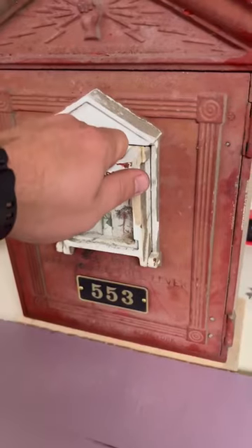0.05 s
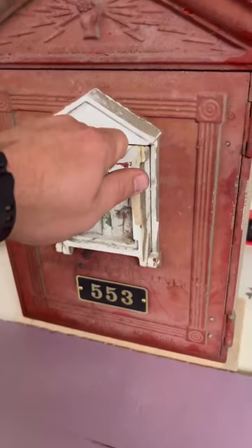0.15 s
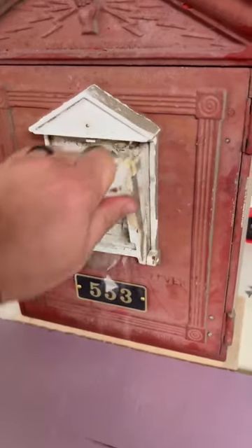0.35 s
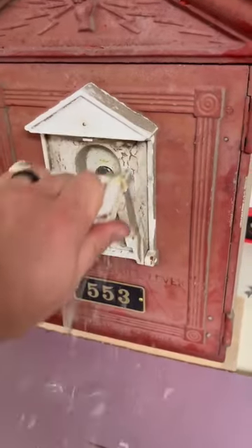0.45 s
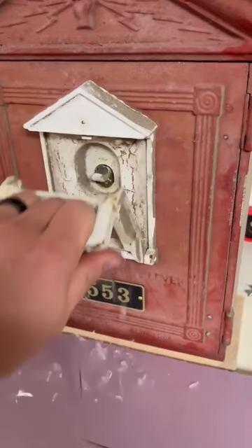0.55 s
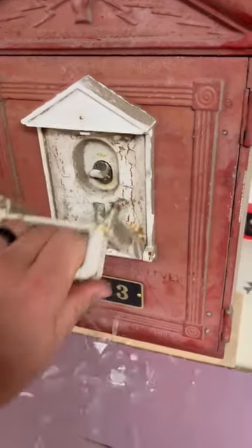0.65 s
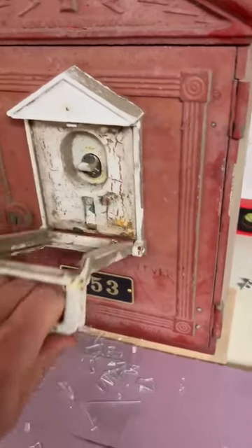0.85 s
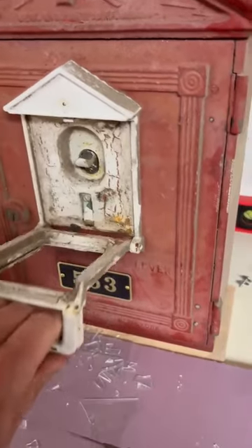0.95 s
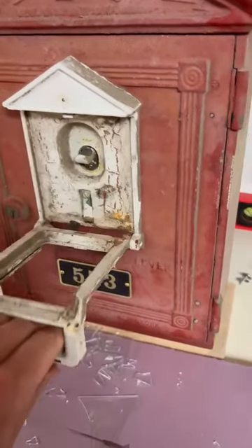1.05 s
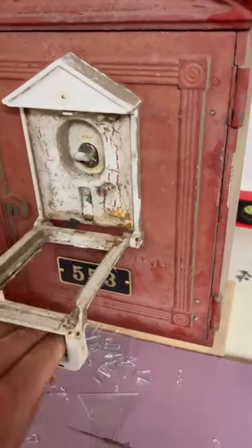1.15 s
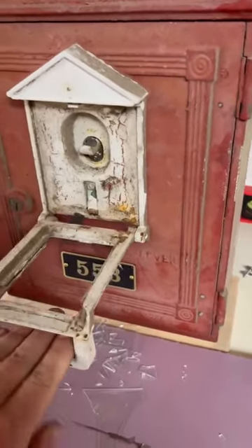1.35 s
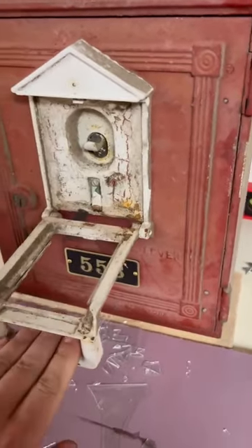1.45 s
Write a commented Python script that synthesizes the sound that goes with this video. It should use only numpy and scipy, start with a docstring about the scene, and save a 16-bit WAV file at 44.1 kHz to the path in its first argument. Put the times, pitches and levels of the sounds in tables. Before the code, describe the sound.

A small glass pane breaks close by in a small room with a faint low hum. At about 0.2 seconds the frame of a metal alarm box door snaps, and near 0.3 the glass cracks sharply as the door comes free with a thump. From 0.4 to 1 second splinters patter on a surface below while larger shards knock, bounce and tinkle. A few faint clicks follow until about 1.5 seconds.

```python
"""Low room hum and rumble, then close ticks: the small door of a metal fire alarm box is pulled open.
Its frame snaps under strain; the glass pane cracks, rings and lets the door go with a thump.
Splinters patter on the surface below, heavy pieces knock on it, larger shards bounce and ring
with their own modes, small pieces click. The small room answers briefly."""
import sys
import numpy as np
from scipy import signal
from scipy.fft import rfft, irfft
from scipy.io import wavfile
from scipy.ndimage import map_coordinates

SR = 44100
rng = np.random.default_rng(int(sys.argv[2]) if len(sys.argv) > 2 else 0)


def wav_record(signal):
    """Record a signal, one row per channel, as 16-bit PCM in the file named by sys.argv[1]."""
    frames = np.transpose(np.atleast_2d(signal))
    bounded = np.clip(frames, -1, 1)
    # unit amplitude maps onto the largest positive 16-bit level
    quanta = np.round(bounded * 32767).astype(np.int16)
    wavfile.write(sys.argv[1], SR, quanta)


N = 66150

# hum envelope [t/s, level/dB]
HUM_ENVELOPE = [(0, -42.5), (.11, -52.5), (.17, -46.5), (1.18, -67), (1.27, -56), (1.35, -66.5)]
# room and handling rumble envelope [t/s, level/dB]
RUMBLE_ENVELOPE = [(0, -52.5), (.22, -48), (.6, -59), (1.0, -61.5), (1.15, -67.5), (1.5, -63.5)]
# rumble spectrum [f/Hz, level/dB]
RUMBLE_SPECTRUM = [(25, -24), (85, -3.5), (140, -6.5), (280, -8.5), (360, -20.5), (480, -17), (2200, -35),
                   (10000, -66)]
# air spectrum [f/Hz, level/dB]
AIR_SPECTRUM = [(300, -5), (1000, -5), (4000, -11), (11000, -35.5)]
# frame snaps [t/s, ring/dB, crack/dB]
FRAME_SNAPS = [(0.2252, -8, -25), (0.2344, -20.5, -32), (0.2655, -10.5, -36)]
# door frame modes [f/Hz, level/dB, t60/s]
FRAME_MODES = [(974, -6, 0.021), (1107, -0.5, 0.036), (2620, -0.5, 0.031), (3590, -15.5, 0.029)]
# crack spectrum [f/Hz, level/dB]
CRACK_SPECTRUM = [(100, -20.5), (700, -16.5), (1150, -2.5), (1600, -1.5), (4500, -1), (10000, 0.5),
                  (12000, -7)]
# splinter patter envelope [t/s, level/dB]
PATTER_ENVELOPE = [(.26, -35), (.29, -32), (.35, -44.5), (.38, -45.5), (.46, -38.5), (.52, -37.5),
                   (.56, -38.5), (.62, -42.5), (.665, -36), (.70, -42.5), (.75, -29.5), (.815, -46.5),
                   (.845, -42.5), (.88, -48.5), (.98, -49.5), (1.06, -61), (1.16, -77.5)]
# splinter and dust spectrum [f/Hz, level/dB]
PATTER_SPECTRUM = [(200, -24.5), (700, -10.5), (1400, -5.5), (2600, 2), (5000, 0.5), (8000, -7),
                   (11500, -14)]
# surface under the patter [f/Hz, level/dB]
BODY_SPECTRUM = [(120, -15), (270, 3), (480, -1), (720, -5), (1400, -1.5), (2400, -6), (5000, -32)]
# pane cracks [t/s, crack/dB, crack t60/s, ring/dB, rise/s]
PANE_CRACKS = [(0.2716, -12.5, 0.059, -9, 0.001), (0.2771, -5, 0.011, -25.5, 0.00029),
               (0.279, -29, 0.371, -28.5, 0.0088), (0.3192, -13, 0.02, -43.5, 0.00034),
               (0.328, -22, 0.1193, -40, 0.0072)]
# modes of the framed pane [f/Hz, level/dB, t60/s]
PANE_MODES = [(1188, 0.5, 0.043), (1316.4, 1.5, 0.053), (1500, -3, 0.07), (1748, -13, 0.17),
              (2440, -8, 0.059), (2880, -9, 0.052), (3716, -20, 0.15)]
# box modes [f/Hz, level/dB, t60/s]
BOX_MODES = [(56, -13, 0.65), (51, -3, 0.11), (135, -10, .06)]
# heavy pieces landing [t/s, ring/dB, bending wave/dB]
HEAVY_LANDINGS = [(0.3216, -39.5, -29), (0.451, -36.5, -55), (0.5235, -26.5, -25), (0.571, -39, -60),
                  (.644, -24, -40), (0.658, -31.5, -31.5), (0.736, -37, -44.5), (.838, -37.5, -48),
                  (.916, -37, -54), (0.963, -40.5, -48)]
# surface modes [f/Hz, level/dB, t60/s]
SURFACE_MODES = [(266.3, -1, 0.21), (286.4, -13, 0.21), (445.5, -3, 0.07), (516.5, -5.5, 0.055),
                 (951, -1, 0.05), (1421, -8, 0.23)]
# shard impacts [t/s, ring/dB, chatter/dB, tilt/(dB/oct), shard name]
SHARD_BOUNCES = [(.3312, -23.5, -20, -5, "flying"), (.386, -35.5, -47.5, -9.5, "spinning"),
                 (0.449, -36, -39, 17, "spinning"), (.499, -31.5, -59, -2, "wedge"),
                 (0.661, -29, -42, 8.5, "plate"), (.692, -27.5, -38, -7, "plate"),
                 (.704, -24.5, -35, -5, "plate"), (.724, -26.5, -34, -6, "plate"),
                 (.739, -22.5, -21, -0.5, "plate"), (.757, -26, -20, 4.5, "plate"),
                 (.829, -33, -49, -0.5, "sliver"), (.8945, -29, -27, 9, "chip"),
                 (.9115, -32, -41, -15, "sliver"), (.929, -41.5, -41, -15.5, "sliver"),
                 (.9622, -24, -33, -8, "sliver"), (.9735, -23, -19.5, 5, "sliver"),
                 (1.023, -53, -29.5, 2, "sliver"), (1.22, -28.5, -31.5, -1.5, "chip")]
# modes by shard name [f/Hz, level/dB, t60/s]
SHARD_MODES = { "flying": [(3943, -2, 0.056), (6608, -15.5, 0.49), (9780, 1.5, 0.11), (9500, -18.5, 0.1),
               (11230, -3.5, 0.2)], "spinning": [(7590, -5, .3), (8990, 3, 0.14), (9230, -13, 0.16)],
               "wedge": [(2700, 4, 0.087), (3790, -8, .25), (4667, 4.5, 0.11), (9539, -10.5, 0.24)],
               "plate": [(6713, -7, 0.21), (6945, -4.5, 0.27), (9119, -8, 0.24), (10200, -10.5, 0.08),
               (9748, -2.5, 0.13), (10037, -2, 0.12), (10650, -7.5, 0.041)], "sliver": [(5150, -1.5, 0.12),
               (6210, -1, 0.062), (7430, -6.5, 0.036), (9250, -4, 0.064), (9405, -6.5, 0.13),
               (11050, 0, 0.026)], "chip": [(2350, -9, 0.022), (4237, -13, 0.017), (5750, -9.5, 0.036),
               (6880, 0, 0.058), (9560, 2, 0.023), (10100, 1, 0.017)]}
# small pieces landing [t/s, level/dB, peak f/Hz, t60/s]
SMALL_LANDINGS = [(.405, -31, 3230, 0.038), (0.4302, -25.5, 2700, 0.021), (0.4753, -15.5, 4200, 0.014),
                  (0.4989, -20, 4540, 0.021), (0.51, -30, 4380, 0.052), (0.576, -36.5, 3620, 0.0142),
                  (0.6494, -17.5, 4676, 0.014), (.757, -21, 4330, 0.02), (0.839, -36, 2350, 0.054),
                  (0.9115, -29, 4070, 0.025), (0.958, -34, 3850, 0.15), (1.0672, -40.5, 3950, 0.022),
                  (1.288, -54, 2170, 0.034), (1.397, -52, 9200, 0.09), (1.428, -54, 7500, .05),
                  (1.469, -55.5, 8060, 0.03)]
# room decay [f/Hz, t60/s]
ROOM_DECAY = [(150, 0.39), (1500, 0.15), (5000, 0.2), (11000, 0.16)]

TOP_HZ, CONTACT_RISE_S = 11500, 0.00029
SCENE_T_S, EVENT_T_S = np.arange(N) / SR, np.arange(SR // 2) / SR
EAR_SIGN = np.array([[1], [-1]])


def amp(db):
    """dB to gain."""
    return 10 ** (np.asarray(db) / 20)


def unit(x):
    """Scale to rms 1."""
    return x / np.sqrt(np.mean(x ** 2) + 1e-20)


def over_hz(points):
    """Function through (f, value) points, log f axis."""
    f_hz, values = np.transpose(points)
    return lambda hz: np.interp(np.log(hz + 1), np.log(f_hz), values)


def envelope(points):
    """Gain per sample from (t, dB) points."""
    return amp(np.interp(SCENE_T_S, *np.transpose(points)))


def coloured(x, db_of_hz):
    """Spectral shaping, rms 1."""
    hz = np.fft.rfftfreq(x.shape[-1], 1 / SR)
    return unit(irfft(rfft(x) * amp(db_of_hz(hz)), x.shape[-1]))


def noise(db_of_hz, width, size=N):
    """Coloured stereo noise; width = side / mid."""
    mid, side = rng.standard_normal((2, size))
    return coloured(mid + width * side * EAR_SIGN, db_of_hz)


def fade(t60_s):
    """Exponential decay."""
    return np.exp(-np.log(1000) * EVENT_T_S / t60_s)


def swell(rise_s):
    """Soft onset."""
    return 1 - np.exp(-(EVENT_T_S / rise_s) ** 2)


def add(out, t_s, sound):
    """Mix in at t_s."""
    i = round(t_s * SR)
    out[:, i:i + sound.shape[-1]] += sound[..., :N - i]


def burst(db_of_hz, t60_s, rise_s):
    """Decaying noise of one contact."""
    return noise(db_of_hz, width=0.38, size=SR // 2) * fade(t60_s) * swell(rise_s)


def ring(modes, spread_rad, scatter_db, tilt_db_oct=0):
    """Damped modes; level, tuning and phase at each ear vary per blow."""
    out, centre_hz = 0, np.mean([m[0] for m in modes])
    for hz, db, t60_s in modes:
        size, side, detune = rng.standard_normal(3)
        phase = 2 * np.pi * hz * (1 + 0.0015 * detune) * EVENT_T_S
        phase = phase + spread_rad * np.sign(side) * EAR_SIGN
        gain = amp(db + scatter_db * size + tilt_db_oct * np.log2(hz / centre_hz))
        out = out + gain * np.sin(phase) * fade(t60_s) * swell(.5 / hz)
    return out / np.linalg.norm(amp([m[1] for m in modes]))


def background(hum_hz=120.7, drift_hz=3, air_db=-75):
    """Wavering hum, room and handling rumble, faint air."""
    drift = map_coordinates(rng.standard_normal(20), [np.linspace(0, 19, N)])
    hum = np.sqrt(2) * np.sin(2 * np.pi * np.cumsum(hum_hz + drift_hz * drift) / SR)
    rumble = noise(over_hz(RUMBLE_SPECTRUM), width=0.19)
    air = noise(over_hz(AIR_SPECTRUM), width=0.49)
    return envelope(HUM_ENVELOPE) * hum + envelope(RUMBLE_ENVELOPE) * rumble + amp(air_db) * air


def frame_snaps(rise_s=0.0024):
    """The strained frame snaps and rings."""
    out = np.zeros((2, N))
    for t_s, ring_db, crack_db in FRAME_SNAPS:
        frame = ring(FRAME_MODES, spread_rad=1.0, scatter_db=-2.5) * swell(rise_s)
        crack = burst(over_hz(CRACK_SPECTRUM), t60_s=0.062, rise_s=rise_s)
        add(out, t_s, amp(ring_db) * frame + amp(crack_db) * crack)
    return out


def splinters(rate_per_s=800, low_hz=1308, range_db=9, dust_db=-5, body_db=-6):
    """Tiny clinks over a hiss of glass dust; the surface adds body once they land."""
    landing_s, fall_spread_s = 0.447, 0.018
    clinks, decay = np.zeros((2, N)), fade(t60_s=0.032)[:SR // 10]
    for when, size, pitch, side in rng.random((int(rate_per_s * N / SR), 4)):
        hz = low_hz + (TOP_HZ - low_hz) * pitch ** 2
        phase = 2 * np.pi * hz * EVENT_T_S[:len(decay)] + (2 * side - 1) * EAR_SIGN
        gain = amp(range_db * size ** 2) * np.sqrt(hz)
        add(clinks, when * (N - 1) / SR, gain * np.sin(phase) * decay)
    spectrum = over_hz(PATTER_SPECTRUM)
    glass = unit(coloured(clinks, spectrum) + amp(dust_db) * noise(spectrum, width=0.5))
    landed = .5 + .5 * np.tanh((SCENE_T_S - landing_s) / fall_spread_s)
    body = amp(body_db) * landed * noise(over_hz(BODY_SPECTRUM), width=0.4)
    started = SCENE_T_S > PATTER_ENVELOPE[0][0]
    return started * envelope(PATTER_ENVELOPE) * (glass + body)


def pane_cracks(pan_db=2):
    """Cracks run through the pane and ring the glass still held."""
    out, pan = np.zeros((2, N)), amp(pan_db / 2 * EAR_SIGN)
    for t_s, crack_db, t60_s, ring_db, rise_s in PANE_CRACKS:
        pane = ring(PANE_MODES, spread_rad=0.37, scatter_db=2.5) * swell(rise_s) * pan
        crack = burst(over_hz(CRACK_SPECTRUM), t60_s, rise_s)
        add(out, t_s, amp(crack_db) * crack + amp(ring_db) * pane)
    return out


def door_thump(t_s=.2888, push_s=.0016, push_db=-17, box_db=-24.5):
    """The door jerks free: one push, and the box rings."""
    out = np.zeros((2, N))
    push = np.exp(-(EVENT_T_S / push_s - 2) ** 2)
    add(out, t_s, -amp(push_db) * push)
    add(out, t_s + 2 * push_s, amp(box_db) * ring(BOX_MODES, spread_rad=0.4, scatter_db=1.5))
    return out


def heavy_knocks(start_hz=870, floor_hz=70, glide_s=0.0118, spread_rad=0.45):
    """Heavy pieces ring the surface and launch a falling bending wave: lows travel slowest."""
    out = np.zeros((2, N))
    hz = np.maximum(start_hz / (1 + EVENT_T_S / glide_s) ** 2, floor_hz)
    phase = 2 * np.pi * np.cumsum(hz) / SR + spread_rad * EAR_SIGN
    wave = np.sin(phase) * fade(t60_s=.11) * swell(rise_s=.002)
    for t_s, ring_db, wave_db in HEAVY_LANDINGS:
        surface = ring(SURFACE_MODES, spread_rad=.6, scatter_db=3.5)
        add(out, t_s, amp(ring_db) * surface + amp(wave_db) * wave)
    return out


def chatter(modes, tilt_db_oct, half_width_hz=89, floor_db=-25):
    """A shard chatters on the surface, blurring its modes into noise bands."""
    def spectrum(hz):
        power = sum(amp(db) ** 2 / (1 + ((hz - f_hz) / half_width_hz) ** 2) for f_hz, db, _ in modes)
        tilt_db = tilt_db_oct * np.log2(np.maximum(hz, modes[0][0]))
        return tilt_db + 10 * np.log10(amp(floor_db) ** 2 + power)
    return burst(spectrum, t60_s=0.03605, rise_s=CONTACT_RISE_S)


def shard_bounces(gap_s=.008, loss_db=5.5):
    """Per bounce: chatter and three quick, weakening touches that ring the shard."""
    out = np.zeros((2, N))
    for t_s, ring_db, chatter_db, tilt_db_oct, name in SHARD_BOUNCES:
        modes = SHARD_MODES[name]
        add(out, t_s, amp(chatter_db) * chatter(modes, tilt_db_oct))
        for touch, jitter in enumerate(rng.uniform(.5, 1, size=3)):
            shard = ring(modes, spread_rad=0.606, scatter_db=2.5, tilt_db_oct=tilt_db_oct)
            add(out, t_s + touch * jitter * gap_s, amp(ring_db - touch * loss_db) * shard)
    return out


def small_clicks(width_oct=0.62, skirt_db=-15):
    """Small pieces land with dry clicks; smaller is brighter."""
    out = np.zeros((2, N))
    for t_s, db, peak_hz, t60_s in SMALL_LANDINGS:
        def hump(hz):
            offset_oct = np.log2((hz + 1) / peak_hz)
            return skirt_db * (1 - np.exp(-.5 * (offset_oct / width_oct) ** 2))
        add(out, t_s, amp(db) * burst(hump, t60_s, CONTACT_RISE_S))
    return out


def room(x, tail_db=-19.5, tail_rise_s=0.024, walls_db=-8.5, walls_span_s=.014, low_cut_hz=250):
    """Ten near reflections per ear and a short tail, both high-passed."""
    hz, t_s, spectra = signal.stft(rng.standard_normal((2, SR // 2)), SR, nperseg=256)
    decay = np.exp(-np.log(1000) * t_s / over_hz(ROOM_DECAY)(hz)[:, None])
    tail = signal.istft(spectra * decay, SR, nperseg=256)[1]
    tail *= 1 - np.exp(-np.arange(tail.shape[1]) / SR / tail_rise_s)
    tail /= np.linalg.norm(tail[0])
    walls = np.zeros_like(tail)
    for ear in range(2):
        delay_s = .001 + walls_span_s * rng.random(10)
        walls[ear, (delay_s * SR).astype(int)] = rng.standard_normal(10)
    walls /= np.linalg.norm(walls, axis=1, keepdims=True)
    low_cut = signal.butter(1, low_cut_hz, "high", fs=SR, output="sos")
    response = signal.sosfilt(low_cut, amp(tail_db) * tail + amp(walls_db) * walls)
    return x + signal.fftconvolve(x, response, axes=1)[:, :N]


def scene():
    """Three groups, each with its own room response, over the background."""
    breakage = room(frame_snaps() + pane_cracks() + door_thump() + heavy_knocks())
    debris = room(small_clicks() + splinters())
    return breakage + debris + room(shard_bounces()) + background()


def record(dry):
    """Steep low-pass on the top treble."""
    return signal.sosfilt(signal.butter(18, TOP_HZ, fs=SR, output="sos"), dry)


dry = scene()
out = record(dry)
wav_record(out)
```